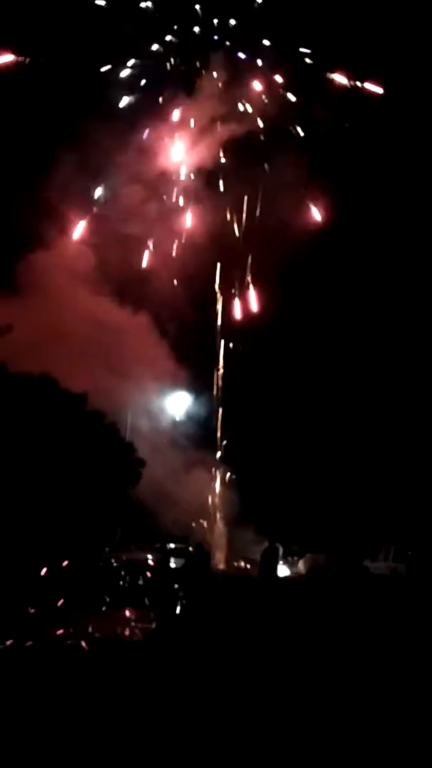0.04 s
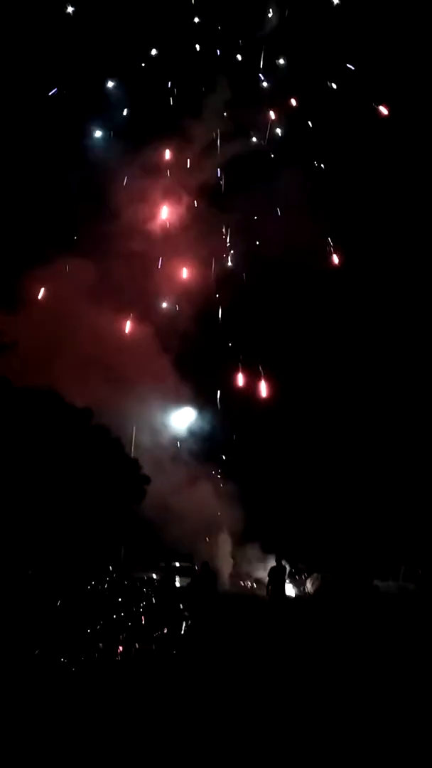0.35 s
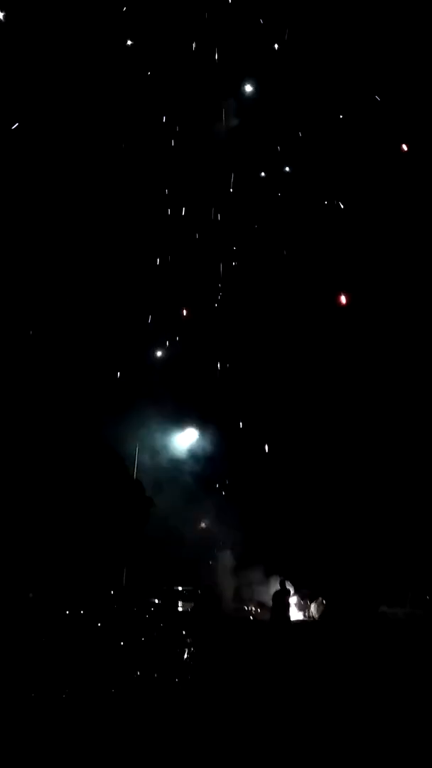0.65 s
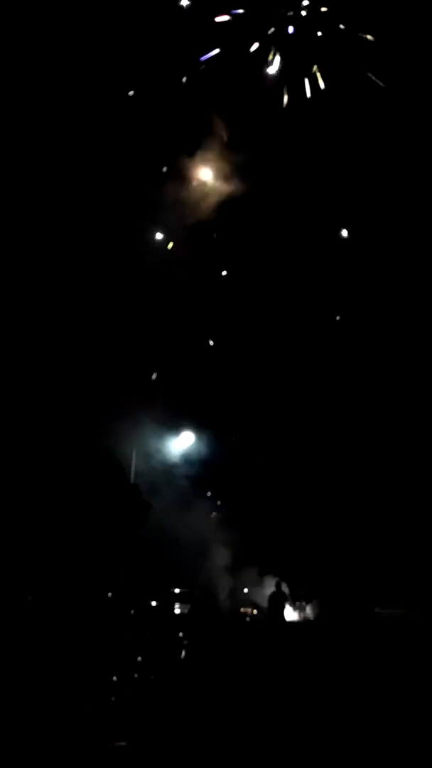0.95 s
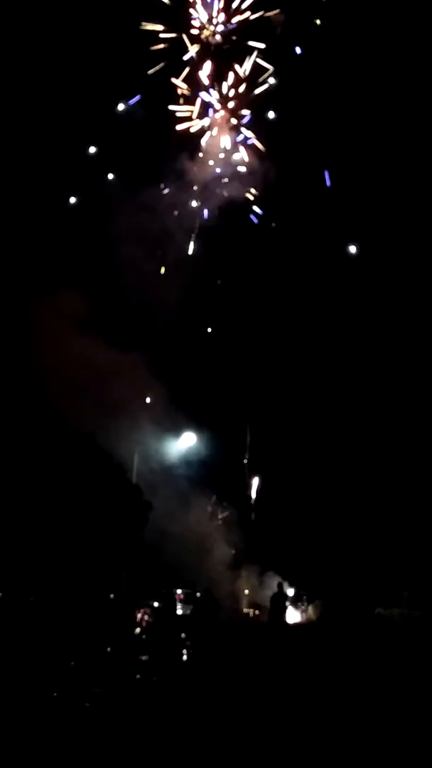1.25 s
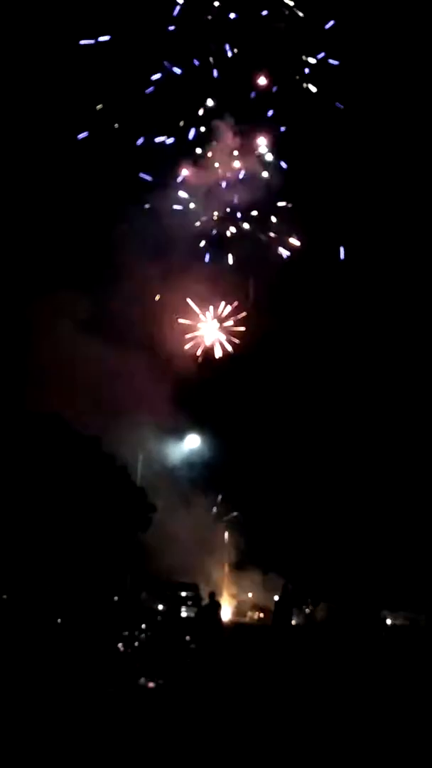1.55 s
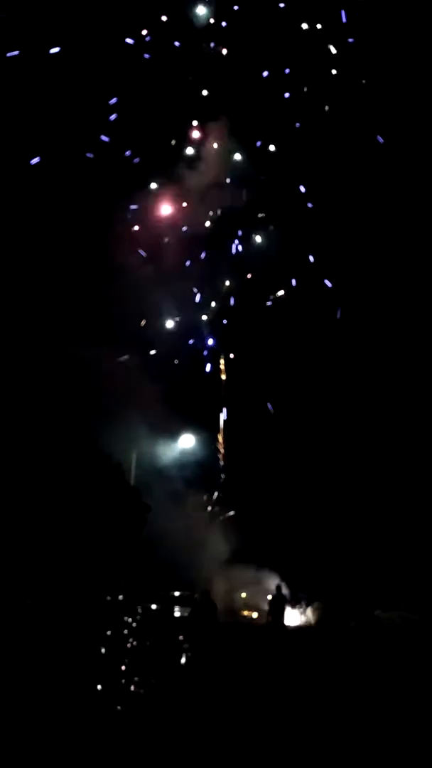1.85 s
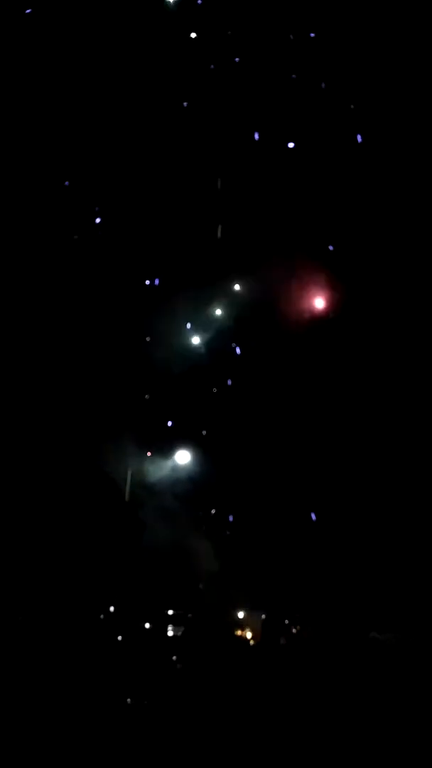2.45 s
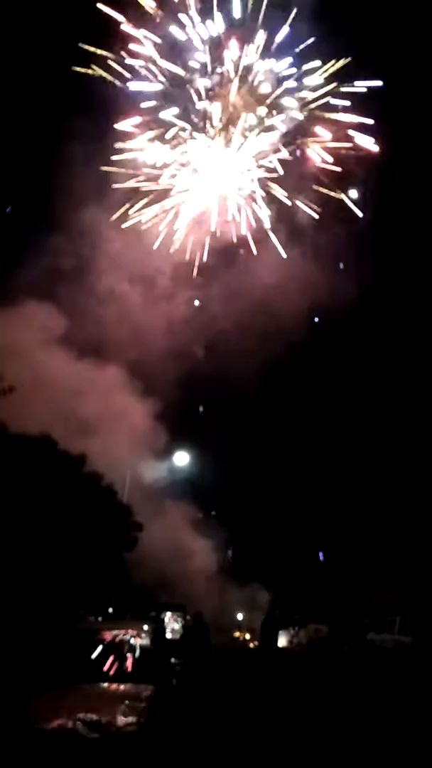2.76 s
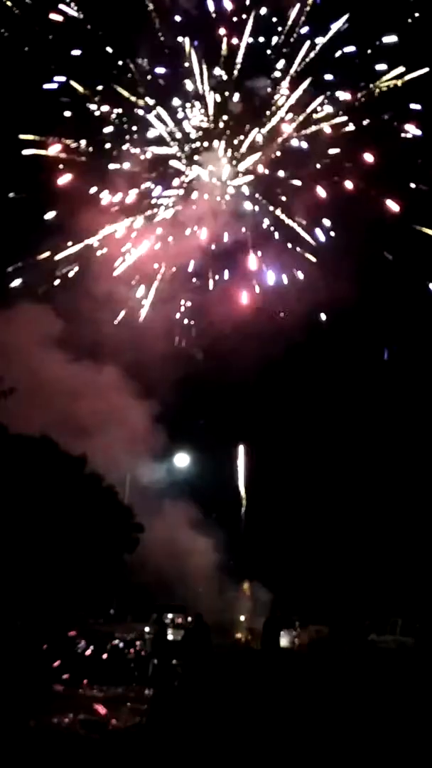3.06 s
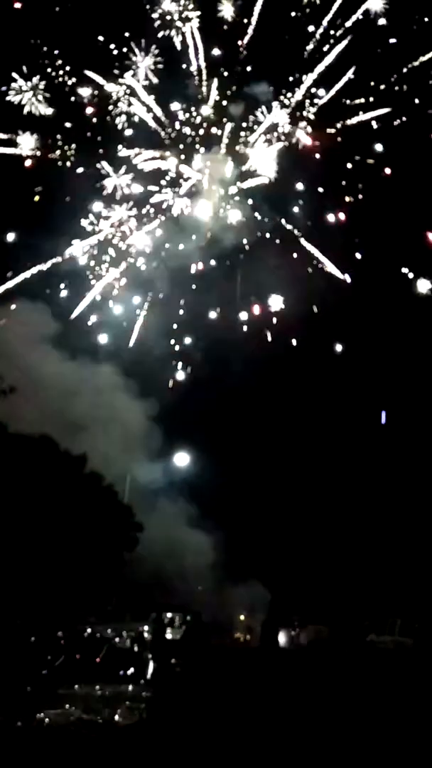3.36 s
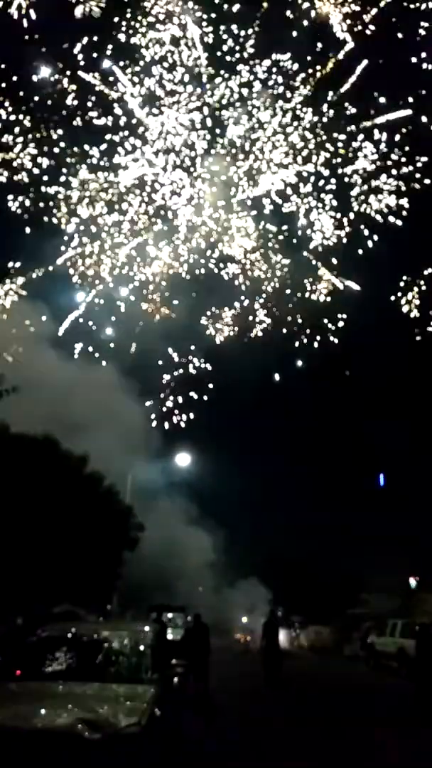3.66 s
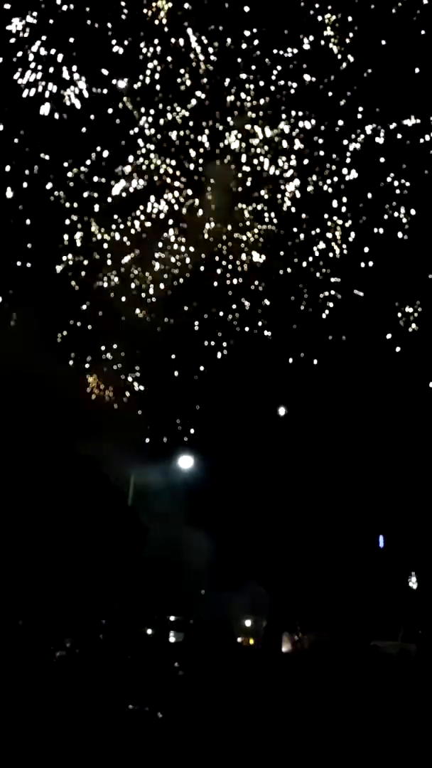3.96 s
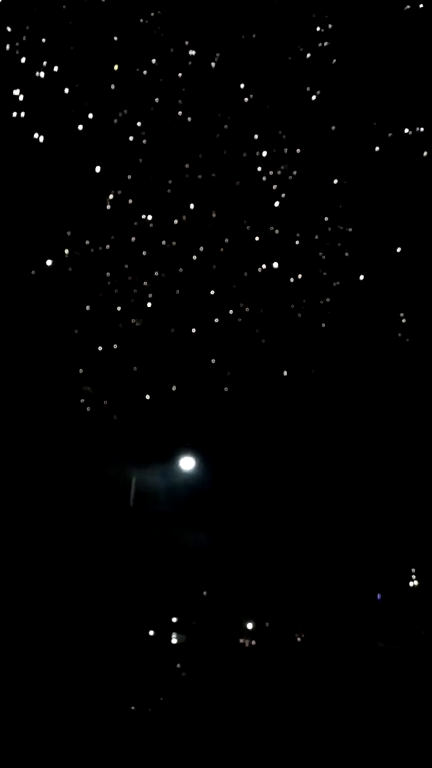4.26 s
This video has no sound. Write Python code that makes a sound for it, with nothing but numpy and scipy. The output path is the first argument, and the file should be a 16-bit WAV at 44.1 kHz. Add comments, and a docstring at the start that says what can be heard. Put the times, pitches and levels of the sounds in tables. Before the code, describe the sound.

A bang opens a dense stream of snapping, fizzing fireworks outdoors among parked cars and houses. Several shells thump in quick succession, the popping briefly thins, then the loudest explosion hits with a long rumble. Swarms of crackle and woody pops carry on, with another heavy boom and two lighter ones near the end. A small stereo microphone clips and briefly ducks on the biggest blast.

```python
"""Crackling firework stars pop singly and in dense swarms over a car park at night.
Each star is a tiny explosion: a hard snap, a short pitched pressure swing and a bright sizzle.
Shells burst with a heavy pressure front and a rolling rumble, over a low murmur of far echoes.
Every report scatters off cars, ground and houses. The small stereo microphone is overloaded:
its limiter ducks after the hardest blast, and the peaks are clipped."""
import sys
import numpy as np
from scipy import signal
from scipy.fft import rfft, irfft, next_fast_len
from scipy.io import wavfile

SR = 44100
rng = np.random.default_rng(int(sys.argv[2]) if len(sys.argv) > 2 else 0)


def digitize_waveform(pressure):
    """Quantize a signal to 16-bit integers and store it at the path in sys.argv[1].

    Rows of a 2-D input are taken as channels; values are limited to [-1, 1].
    """
    field = np.atleast_2d(pressure).T
    bounded = np.clip(field, -1, 1)
    quanta = np.round(bounded * 32767).astype(np.int16)
    wavfile.write(sys.argv[1], SR, quanta)


N = 314433
TIME = np.arange(N) / SR


def amp(db):
    """Decibels to gain."""
    return np.exp(np.asarray(db) * np.log(10) / 20)


def butter(x, order, hz, kind="low"):
    """Roll off the highs or the lows."""
    return signal.sosfilt(signal.butter(order, hz, kind, fs=SR, output="sos"), x)


def delay(x, seconds):
    """The same sound, arriving later."""
    return np.interp(TIME - seconds, TIME, x)


def at_hz(rows, hz):
    """Columns of a table, joined on a log-frequency axis."""
    knots, *columns = np.transpose(rows)
    return [np.interp(np.log(hz + 1), np.log(knots), column) for column in columns]


def die_away(power, t60):
    """Each input sample starts a power decay of its own height."""
    return signal.lfilter([1], [1, -amp(-120 / (t60 * SR))], power + 1e-18)


def ring(clicks, hz, t60):
    """A unit click sets a sine of height 1 ringing."""
    r, w = amp(-60 / (t60 * SR)), 2 * np.pi * hz / SR
    return signal.lfilter([0, np.sin(w)], [1, -2 * r * np.cos(w), r * r], clicks + 1e-18)


def resonate(x, resonances):
    """Each resonance adds a narrow band of the sound to itself."""
    out = x
    for hz, width_hz, db in resonances:
        r = np.exp(-np.pi * width_hz / SR)
        band = signal.lfilter([1, 0, -1], [1, -2 * r * np.cos(2 * np.pi * hz / SR), r * r], x)
        out = out + amp(db) * (1 - r * r) / 2 * band
    return out


# Stereo image: the two microphone ports hear the bass out of phase, and the right one is duller.
# (frequency [Hz], likeness [0-1], right phase lead [rad], left minus right [dB])
STEREO_IMAGE = [(24.8, 0.96, 9.5, 9), (83.4, 1, 4, -0.5), (320, 0.82, 3, 2), (783, 0.8, 2, 3.5),
                (1260, 0.18, 1.0, 6), (2370, 0.35, -0.25, 6.5), (4730, 0.05, 3.5, 6), (7100, 0, -41, 3.5),
                (12000, 0.1, 0, 21.5), (15000, 0, 0, 21)]

def scatter(colour, grain_db, grain_samples=16):
    """Countless small echoes of uneven strength, as the two ports hear them; rms 1."""
    length = next_fast_len(N)
    grains = amp(grain_db * rng.standard_normal(length // grain_samples + 1).clip(-2, 2))
    strength = np.repeat(grains, grain_samples)[:length]
    left, unrelated = rfft(rng.standard_normal((2, length)) * strength)
    hz = np.arange(len(left)) * SR / length
    alike, lead, lean_db = at_hz(STEREO_IMAGE, hz)
    alike = alike.clip(0, 1)
    right = alike * np.exp(1j * lead) * left + np.sqrt(1 - alike ** 2) * unrelated
    ports = np.array([left * amp(lean_db), right]) / np.hypot(1, amp(lean_db))
    wash = irfft(ports * amp(at_hz(colour, hz)), length)[:, :N]
    return wash / np.sqrt(np.mean(wash ** 2) + 1e-20)


def pressure_swings(clicks, low_hz, high_hz, t60, port_lag_s, pitches=8):
    """Each click becomes a steep, brief swing at a random pitch, later and louder on the left."""
    choice = rng.integers(0, pitches, N)
    pitch_hz = np.geomspace(low_hz, high_hz, pitches)
    swing = sum(ring(clicks * (choice == k), hz, t60) for k, hz in enumerate(pitch_hz))
    # a small charge radiates next to nothing far below its own pitch
    swing = butter(swing, 1, 0.29 * low_hz, "high")
    return np.array([delay(swing, port_lag_s), 0.41 * swing])


# Shell bursts, launches and their strongest echoes:
# (time [s], pressure front [dB], low rumble [dB], mid roar [dB], decay t60 [s])
SHELL_CUES = [(0.0, -1, -12, -13.5, 1.67), (.985, -2, -18, -6.5, 0.43), (1.101, -9, -25, -11.5, 1.4),
              (1.273, 1, -16, -14.5, 1.1), (1.405, -14, -25, -2.5, .26), (1.491, -4, -22, -10.5, 1.07),
              (1.704, -5, -20, -16, 0.42), (1.797, -21, -17, -10, 0.42), (1.976, -16, -20, -36, 0.25),
              (2.093, -13, -20, -48, 0.41), (2.883, -2, -3, -24, .38), (2.893, 27.5, -12, -13.5, 2.4),
              (2.913, 2, 0.5, -7, 0.32), (3.183, -8, -19, -28, 2.3), (4.786, 6, -5.5, -18, 0.91),
              (4.825, -12, -16, -15.5, 0.81), (6.798, -6, -11, -23, 0.73), (7.072, -12, -12, -21, 1.1)]
# Tone of the deep rumble and of the midrange roar: (frequency [Hz], level [dB])
RUMBLE_EQ = [(20, -33), (35, -46), (55, -4.5), (150, 4.5), (280, 1.5), (450, -12), (800, -45), (2000, -37),
             (6000, -28), (16000, -83)]
ROAR_EQ = [(100, -8.5), (250, -8.5), (430, -3.5), (650, -1.5), (850, -4), (1200, -21), (3000, -23),
           (8000, -23), (16000, -85)]
# The car park's low, hollow note in the echoes: (frequency [Hz], width [Hz], added level [dB])
CAR_PARK_BOOM = [(320, 86, -4.5), (455, 120, -5)]

def shells(front_s, edge_hz, port_lag_s, slaps_per_s, slap_t60):
    """An N-shaped pressure front, slaps fluttering between the parked cars, then echoes that roll on for a
    while and die."""
    hold_share = 0.084  # part of its t60 for which a roll stays at full level
    front, slap_gain, rumble_power, roar_power = np.zeros((4, N))
    for start, front_db, rumble_db, roar_db, t60 in SHELL_CUES:
        age = TIME - start
        front += amp(front_db) * (age > 0) * (age < front_s) * (1 - 2 * age / front_s)
        roll = (age > 0) * amp(-60 * np.maximum(age / t60 - hold_share, 0))
        slap_gain += amp(rumble_db - 60 * np.abs(age) / slap_t60) * roll
        rumble_power += (amp(rumble_db) * roll) ** 2
        roar_power += (amp(roar_db) * roll) ** 2
    front = butter(front, 2, edge_hz)
    punch = np.array([-delay(front, port_lag_s), 0.58 * front])
    walls = (rng.random(N) < slaps_per_s / SR) * rng.standard_normal(N)
    slaps = pressure_swings(slap_gain * walls, low_hz=187, high_hz=510, t60=0.01, port_lag_s=0.00072)
    rumble = np.sqrt(rumble_power) * scatter(RUMBLE_EQ, grain_db=3.5, grain_samples=256)
    roar = np.sqrt(roar_power) * scatter(ROAR_EQ, grain_db=2.0, grain_samples=256)
    return punch + resonate(amp(3.5) * slaps + amp(-0.16) * (rumble + roar), CAR_PARK_BOOM)


# Dark tone of the background bed: (frequency [Hz], level [dB])
MURMUR_EQ = [(20, -32), (35, -25), (60, -14), (150, 9), (330, -4), (600, -25), (2000, -42), (8000, -48)]

def night_murmur():
    """Far echoes blur into a low, steady bed."""
    return amp(-38.0) * scatter(MURMUR_EQ, grain_db=4.0, grain_samples=512)


# Shells that open into a cloud of small stars: (time [s], hold [s], crackle [dB], sizzle [dB])
CLOUD_CUES = [(0.0, 0.13, -10, -15.5), (0.172, 0.82, -10.5, -22), (1.072, 0.027, -10, -8),
              (1.22, 0.62, -12, -26), (2.368, 0.11, -13.5, -40), (2.869, 0.4, -14.5, -19),
              (3.422, 0.37, -11.5, -19.5), (3.66, 0.25, -10, -18), (4.694, 0.13, -26, -13.5),
              (4.954, 0.23, -14.5, -25), (5.196, 0.59, -19, -32), (5.823, 0.83, -19, -35),
              (6.811, 0.22, -17, -33), (7.05, 0.054, -11, -15)]

def cloud_envelope(levels_db, fade_db_per_s, rise_s=0.004):
    """Each cloud of stars lights up quickly, burns for a while and fades."""
    power = 0
    for (start, hold, *_), db in zip(CLOUD_CUES, levels_db):
        age = TIME - start
        attack = np.clip(age / rise_s, 0, 1)
        power = power + (attack * amp(db - fade_db_per_s * np.maximum(age - hold, 0))) ** 2
    return np.sqrt(power)


def star_swarm(per_s, spread_db):
    """Small stars explode at random within the clouds: triggers for their body and their sizzle."""
    _, _, crackle_db, sizzle_db = np.transpose(CLOUD_CUES)
    explodes = rng.random(N) < per_s / SR
    sizes = explodes * amp(spread_db * rng.standard_normal(N).clip(-2, 2))
    body = sizes * amp(-5.5) * cloud_envelope(crackle_db, fade_db_per_s=87)
    sizzle = sizes * amp(-12.5) * cloud_envelope(sizzle_db, fade_db_per_s=164)
    return body, sizzle


# Foreground stars that stand out of the crackle: (time [s], level [dB])
STAR_CUES = [(.104, -3), (0.16, -11), (0.21, -1.5), (0.291, -1), (0.327, -2.5), (.389, 2), (0.449, 0),
             (0.509, -8), (0.578, 1.5), (0.635, -3.5), (0.699, -3.5), (0.743, -5), (.789, 0.5),
             (0.827, 0.5), (.884, -1), (0.923, -5), (0.984, -2), (1.131, -3), (1.244, -6), (1.275, -27),
             (1.354, -3), (1.405, -1), (1.425, -3), (1.493, -1), (1.539, 2), (1.599, -2), (1.662, -1.5),
             (1.7, -3), (1.728, -7), (1.795, -7), (1.86, -5.5), (1.915, -11.5), (1.932, -12.5),
             (2.001, -12.5), (2.055, -11), (2.08, -16), (2.136, -13.5), (2.164, -13.5), (2.205, -13.5),
             (2.242, -10.5), (2.289, -11.5), (2.327, -11.5), (2.365, -10.5), (2.401, -4), (2.424, -9),
             (2.461, -2.5), (2.526, -6), (2.562, -8), (2.613, -4.5), (2.63, -2), (2.715, -7), (2.766, -6.5),
             (2.826, -4.5), (2.84, -4.5), (2.973, -22), (3.108, -14), (3.179, -4), (3.257, -7.5),
             (3.366, 3), (3.434, 1.5), (3.548, -12), (3.615, -3.5), (3.666, -2), (3.755, -6), (3.788, -8),
             (3.866, -5), (3.952, -6), (3.982, -4), (4.005, 2), (4.1, -2.5), (4.137, -2.5), (4.183, -7),
             (4.235, -3.5), (4.311, -2), (4.373, -0.5), (4.404, -7), (4.429, -2), (4.518, -10),
             (4.53, -6.5), (4.612, -6), (4.642, -7.5), (4.67, -1), (4.702, -2), (4.742, -1.5), (4.777, -5),
             (4.855, -5), (4.902, -2), (5.005, -4.5), (5.082, -1.5), (5.13, -2), (5.166, -3), (5.218, 1.5),
             (5.257, -7.5), (5.311, -6.5), (5.348, -2), (5.372, -4.5), (5.391, -6.5), (5.411, -4.5),
             (5.442, -1), (5.493, -2.5), (5.57, -2.5), (5.591, -3.5), (5.623, -3), (5.636, -5.5),
             (5.66, -7), (5.779, -2), (5.824, -5.5), (5.846, -1.5), (5.877, -5), (5.932, -1), (5.95, -1),
             (5.995, -3), (6.052, -5.5), (6.105, 0.5), (6.122, -12), (6.138, -10), (6.196, 2), (6.223, -6),
             (6.265, -5.5), (6.282, -5), (6.315, -1.5), (6.341, -3), (6.359, -4.5), (6.416, -0.5),
             (6.488, -5), (6.523, -3), (6.558, -2), (6.6, -3), (6.647, 0), (6.69, -5.5), (6.779, -8.5),
             (6.79, -2.5), (6.836, -2.5), (6.875, 1.5), (6.903, -4.5), (6.948, -4), (7.003, -3.5),
             (7.064, -5)]
# Treble that goes with a full-strength pop: (time [s], level [dB])
SIZZLE_SEND = [(0, -11), (.9, -12), (1.5, -13), (2.2, -7.5), (2.7, -15), (3.4, -13.5), (4.0, -15.5),
               (4.5, -20.5), (4.7, -17), (5.1, -16), (6.2, -16), (6.55, -16.5), (7.1, -13)]
# Extra bright spits of treble, nearly all on top of a star's pop: (time [s], level [dB])
SPIT_CUES = [(.985, -9.5), (1.275, -14.5), (1.795, -25), (2.134, -18.5), (2.562, -15.5), (2.715, -15),
             (2.86, -15.5), (2.973, -16), (3.107, -15), (6.197, -16)]

def star_triggers():
    """Clicks that set off body and sizzle: big stars and extra treble spits on top of the swarm."""
    body, sizzle = star_swarm(per_s=150, spread_db=5.5)
    times, levels_db = np.transpose(STAR_CUES)
    hits = np.clip(np.round(times * SR).astype(int), 0, N - 1)
    body[hits] = amp(levels_db)
    # louder pops sizzle more, almost dB for dB
    sizzle[hits] = amp(0.96 * levels_db + np.interp(times, *np.transpose(SIZZLE_SEND)))
    for start, db in SPIT_CUES:
        hit = int(start * SR)
        sizzle[hit] = np.hypot(sizzle[hit], amp(db))
    return body, sizzle


# Bigger charges ring hollow, smaller ones crack: (time [s], hollow minus crack [dB])
CHARGE_BALANCE = [(0, -3), (.9, -0.5), (1.5, 3.5), (2.2, 2.5), (2.7, 4), (3.6, 0.5), (3.9, 0.5), (4.3, 5),
                  (4.75, 4.5), (5.5, 2), (6.3, 3), (7.1, 3.5)]

def split_by_charge(body):
    """The size of the charge tilts each star between a hollow ring and a crack."""
    tilt = amp(np.interp(TIME, *np.transpose(CHARGE_BALANCE)) / 2)
    return body * tilt, body / tilt


# Tone of the pops' hollow echoes and of their cracking echoes: (frequency [Hz], level [dB])
HOLLOW_EQ = [(25, -42), (50, -32), (120, -17), (220, -8), (310, -7.5), (450, -33), (650, 0.5), (880, -0.5),
             (1020, 1.5), (1250, -16.5), (3000, -39)]
CRACK_EQ = [(30, -30), (150, -6), (500, -8), (750, -7.5), (1150, -4.5), (1500, -1.5), (2200, -6),
            (2800, -4), (3400, -11), (4200, -10), (5300, -16), (9000, -32.5)]
# Ring that close reflections give to every pop: (frequency [Hz], width [Hz], added level [dB])
POP_RESONANCES = [(301, 25, -3.5), (899, 54, -6), (1433, 450, -10), (2233, 100, 1.5), (4060, 670, -9)]

def star_pops(hollow, crack):
    """Each pop is followed by quick echoes off nearby cars and a longer tail from the houses."""
    direct = pressure_swings(hollow, low_hz=684, high_hz=1100, t60=0.016, port_lag_s=0.00031)
    # a higher, woody knock rides on each pop and comes again off the ground
    knock = pressure_swings(hollow, low_hz=1420, high_hz=1600, t60=0.024, port_lag_s=0.00005, pitches=4)
    knock = knock + 0.47 * np.array([delay(side, seconds=0.0075) for side in knock])
    hollow_power = 0.4 * die_away(hollow ** 2, t60=0.082) + 0.25 * die_away(hollow ** 2, t60=0.19)
    crack_power = 0.11 * die_away(crack ** 2, t60=0.06) + 0.35 * die_away(crack ** 2, t60=0.31)
    hollow_echo = np.sqrt(hollow_power) * scatter(HOLLOW_EQ, grain_db=-2.0, grain_samples=64)
    crack_echo = np.sqrt(crack_power) * scatter(CRACK_EQ, grain_db=1.5)
    pops = amp(-2.0) * direct + amp(-9.5) * knock + amp(-5.0) * hollow_echo + amp(-2.5) * crack_echo
    return resonate(pops, POP_RESONANCES)


# Bright tone of the sizzle: (frequency [Hz], level [dB])
SIZZLE_EQ = [(1500, -2.5), (4000, -17.5), (5400, -3), (7000, -1), (10000, 0), (12300, 2.5), (13800, -2.5),
             (16000, -14)]

def star_sizzle(clicks, air_hz):
    """A tick and a gritty hiss close by; the air takes the top off what comes the long way round."""
    near_power = die_away(clicks ** 2, t60=0.25) + 2.0 * die_away(clicks ** 2, t60=0.025)
    near = np.sqrt(near_power) * scatter(SIZZLE_EQ, grain_db=5.0)
    far = np.sqrt(die_away(clicks ** 2, t60=0.24)) * scatter(SIZZLE_EQ, grain_db=2.5)
    return amp(-3.0) * near + amp(0.06) * butter(far, 2, air_hz)


# Midrange bite of a pop's attack: (frequency [Hz], level [dB])
SNAP_EQ = [(30, -40), (300, -11), (500, -15), (700, 3), (1200, -4.5), (1550, 5.5), (2000, 1), (2800, -11),
           (3400, -14), (5300, -43), (9000, -21)]

def star_snaps(crack):
    """A star's shock front is one hard snap, a few milliseconds long."""
    return amp(-6.5) * np.sqrt(die_away(crack ** 2, t60=0.017)) * scatter(SNAP_EQ, grain_db=4.0)


def scene():
    """Stars and shells over the low murmur of far echoes."""
    murmur = night_murmur()
    body, sizzle = star_triggers()
    hollow, crack = split_by_charge(body)
    stars = star_pops(hollow, crack) + star_sizzle(sizzle, air_hz=12900) + star_snaps(crack)
    bangs = shells(front_s=0.0052, edge_hz=7800, port_lag_s=0.00102, slaps_per_s=470, slap_t60=0.4)
    return stars + bangs + murmur


def limiter(x, top_db, release_db_per_s, attack_s):
    """Each channel is turned down by its own peaks and recovers at a steady rate."""
    over_db = np.maximum(20 * np.log10(np.abs(x) + 1e-9) - top_db, 0)
    release_db = release_db_per_s * TIME
    duck_db = np.maximum.accumulate(over_db + release_db, axis=1) - release_db
    r = np.exp(-1 / (attack_s * SR))
    return x * amp(-signal.lfilter([1 - r], [1, -r], duck_db))


def record(dry):
    """The limiter catches the blasts, the deepest bass is lost, peaks are flattened, the top is cut."""
    limited = limiter(dry, top_db=2.5, release_db_per_s=656, attack_s=0.00039)
    limited = butter(limited, 2, 34, "high")
    clipped = limited / (1 + limited ** 6) ** (1 / 6)
    clipped = butter(clipped, 1, 22, "high")
    top_cut = signal.ellip(10, .1, 70, 16000, fs=SR, output="sos")
    return signal.sosfilt(top_cut, clipped)


dry = scene()
out = record(dry)
digitize_waveform(out)
```